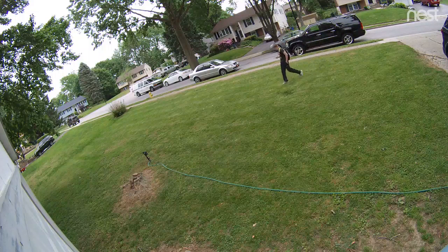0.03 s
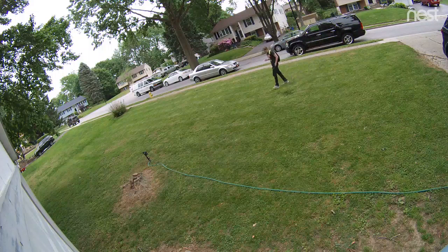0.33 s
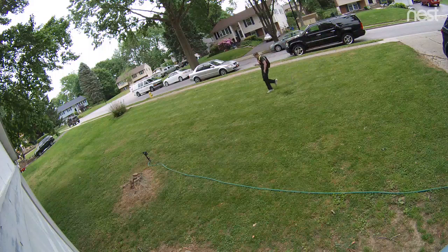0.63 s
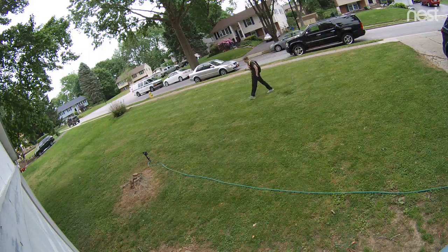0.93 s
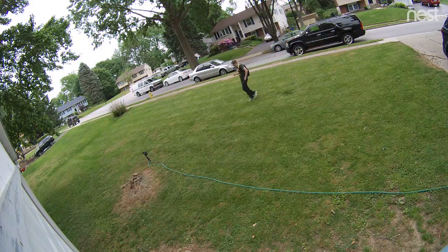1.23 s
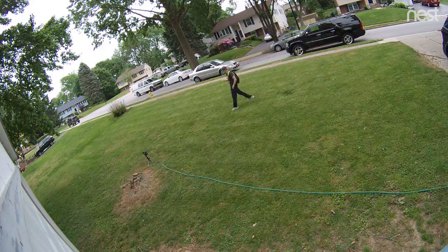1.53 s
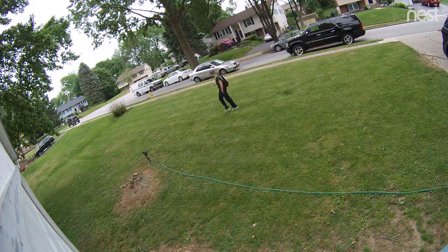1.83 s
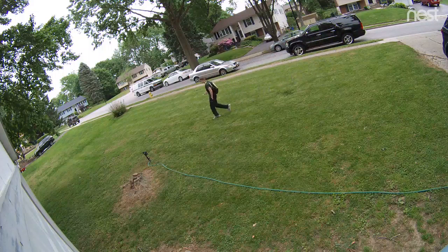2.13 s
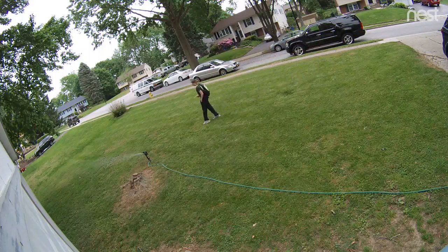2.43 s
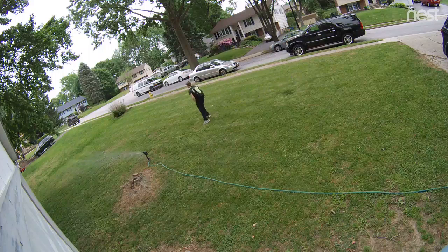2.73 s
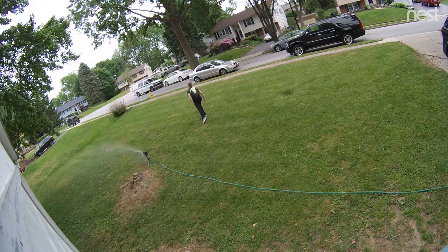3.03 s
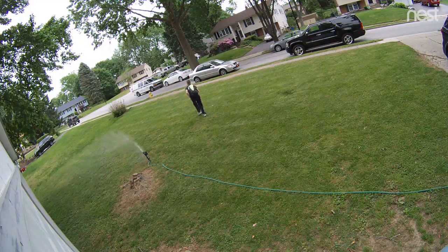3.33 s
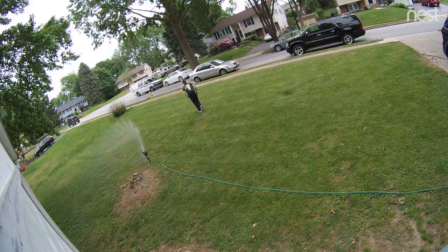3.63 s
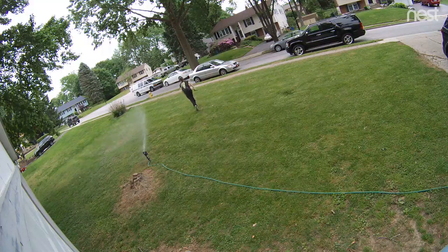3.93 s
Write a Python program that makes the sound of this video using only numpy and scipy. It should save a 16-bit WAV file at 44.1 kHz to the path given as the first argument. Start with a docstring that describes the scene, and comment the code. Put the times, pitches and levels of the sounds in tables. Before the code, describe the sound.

A lawn sprinkler hisses with air, then ticks rapidly as it sprays water.

```python
"""An impact sprinkler on a front lawn, heard by a small camera on the house wall.
First the nozzle gives a hollow hiss, likely air from the hose, and two faint peeps sound. As the water
comes up, the brighter hiss of the jet takes over. From about 2.2 s the arm slaps the jet twelve times
a second, each slap a sharp spurt with a puff of spray, reflected by the house front.
Street noise and a far engine, perhaps a mower, lie behind it to the end."""
import sys
import numpy as np
from scipy import signal
from scipy.fft import rfft, irfft
from scipy.io import wavfile
from scipy.ndimage import uniform_filter1d

SR = 44100
rng = np.random.default_rng(int(sys.argv[2]) if len(sys.argv) > 2 else 0)


def pcm_store(signal):
    """Save signal as 16-bit PCM."""
    levels = np.round(np.clip(np.atleast_2d(signal), -1, 1) * 32767)
    wavfile.write(sys.argv[1], SR, levels.astype(np.int16).T)


N = 176400
EDGE_HZ = 7300  # upper band limit

# Spectrum of a slap. Each row: frequency in Hz, relative level in dB.
SLAP_SPECTRUM = [(300, -49.5), (1600, -39.5), (2200, -8.5), (3550, -9), (3900, 2.5), (4280, 8),
                 (4500, -0.5), (5050, 6.5), (5370, -3), (5470, -8), (5700, -8), (6180, -6.5), (6350, -9.5),
                 (6950, -11), (7350, -34.5)]
GRAZE_S, ATTACK_S, RELEASE_S = .004, .0006, .001
PUFF_RISE_S, PUFF_FADE_S = .012, .028


def slap(level_db, length_s, body_db, sizzle_db, puff_db):
    """Atomisation by impact: the arm grazes the jet, bursts it, and leaves spatter and a puff of spray."""
    size = 4096
    t = np.arange(size) / SR - 2 * GRAZE_S  # zero at the impact
    after = np.maximum(t, 0)
    graze = gain_of(-11) * np.exp(-abs(t) / GRAZE_S) * (t < 0)
    burst = np.clip(t / ATTACK_S + 1, 0, 1) * np.exp(-np.maximum(t - length_s, 0) / RELEASE_S)
    spatter = gain_of(-11) * np.exp(-((t - .007) / .0026) ** 2 / 2)  # peaks 7 ms after the impact
    envelope = np.sqrt(burst ** 2 + graze ** 2 + spatter ** 2)  # incoherent parts add in power
    grains = rng.standard_normal(size) * gain_of(1.9 * wander(size, rate_hz=1300))
    tilt = [(3040, body_db), (3920, 0), (5100, 0), (5940, sizzle_db)]
    spectrum = [(hz, db + level_at(tilt, hz)) for hz, db in SLAP_SPECTRUM]
    crack = coloured(grains * envelope, spectrum, ripple_db=2.4)
    crack *= np.linalg.norm(envelope) / np.linalg.norm(crack)
    puff = coloured(rng.standard_normal(size), JET_SPECTRUM)
    puff *= (1 - np.exp(-after / PUFF_RISE_S)) * np.exp(-after / PUFF_FADE_S)
    return gain_of(level_db + 1.9) * (crack + gain_of(puff_db) * puff)


# Blows of the arm. Each row: impact time in seconds, relative level in dB, length in seconds,
# extra body in dB, extra sizzle in dB, level of the puff against the slap in dB.
ARM_SLAPS = [(2.1875, -45, .0085, 7, -1, -16), (2.2791, -37.9, .0042, 5.5, 4, -16),
             (2.3582, -37.7, .003, 1, 2, -13), (2.4401, -35.5, .003, 1, -1, -15),
             (2.5208, -39.7, .004, 3.5, 7, -10.5), (2.6028, -36.8, .0026, -1.5, 4, -9),
             (2.6847, -36, .0026, -4.5, 6, -16), (2.7643, -41.7, .0083, 2, 2, -16),
             (2.8468, -39.3, .004, 1.5, 1, -14), (2.9265, -40.8, .0057, 2.5, 0, -10),
             (3.0075, -38.4, .0046, -8.5, 0, -15), (3.0897, -37.3, .004, -1.5, 3, -26),
             (3.1719, -37.2, .003, -5, 3.5, -22), (3.2525, -40.8, .003, 0, -3, -10),
             (3.3349, -40.4, .0039, -1.5, -4, -9), (3.4179, -38.9, .0027, -2.5, -11, -18),
             (3.4996, -41.2, .004, 1, -1.5, -14), (3.5816, -43.6, .0051, 0, -3, -10),
             (3.6637, -41.5, .0051, -6, -2.5, -10), (3.7461, -40, .0034, -3.5, 3, -17),
             (3.8279, -41.8, .0044, 2.5, 3, -10), (3.9105, -40, .0045, -4.5, 0, -13),
             (3.9937, -37.8, .0021, 0, -5, -15)]


def arm():
    """Periodic interruption: the swinging arm cuts the jet and makes a train of pulses."""
    out = np.zeros(N)
    for impact_s, *blow in ARM_SLAPS:
        add(out, impact_s - 2 * GRAZE_S, slap(*blow))
    return out


# Bright hiss of the jet and its spray. Each row: frequency in Hz, relative level in dB.
JET_SPECTRUM = [(600, -52), (1400, -18), (1800, -5), (2300, 0), (3200, 1), (4100, 3), (5150, 4),
                (5500, -5.5), (6150, -7), (6400, -8), (7150, -23.5)]
# Strength of the jet's hiss. Each row: time in seconds, relative level in dB.
JET_ENVELOPE = [(0, -66), (0.318, -66.5), (.5, -69), (.85, -72), (1.1, -56), (1.25, -66), (1.861, -70.5),
                (1.97, -61), (2.07, -62), (2.2, -53), (2.5, -53.5), (2.72, -52), (3.102, -56),
                (3.37, -52.5), (3.47, -56.5), (3.56, -53), (3.68, -52.5), (3.8, -55.5), (4, -56)]


def water_jet():
    """Turbulence: the sputtering water jet radiates a bright hiss."""
    return hiss(JET_SPECTRUM, JET_ENVELOPE, flicker_db=1.6)


# Hollow hiss of the air. Each row: frequency in Hz, relative level in dB.
AIR_SPECTRUM = [(600, -22), (1200, -15), (1750, -7.5), (2050, -2), (2350, -3), (2900, -1), (3250, 2.3),
                (3620, 1), (4050, -6), (4400, -3), (4700, 0), (5250, -1), (5550, -6), (6300, -16),
                (6950, -19)]
# Strength of the air's hiss. Each row: time in seconds, relative level in dB.
AIR_ENVELOPE = [(0, -53), (.2, -54), (.38, -52), (.66, -56), (1.0, -54.5), (1.11, -57), (1.2, -52.5),
                (1.3, -54.5), (1.42, -53.5), (1.55, -54.5), (1.7, -55), (1.89, -50.5), (2.15, -53),
                (2.5, -66.5), (3.1, -71), (4, -64.5)]


def hose_air():
    """Flow noise: a steady hollow hiss, likely air driven out ahead of the water."""
    return hiss(AIR_SPECTRUM, AIR_ENVELOPE, flicker_db=.5)


def hiss(spectrum, envelope, flicker_db, drops_per_s=500):
    """Source and filter: rushing noise and the random impulses of drops share one spectrum."""
    drops = rng.standard_normal(N) * (rng.random(N) < drops_per_s / SR)
    drops *= gain_of(4 * np.minimum(rng.exponential(1, N), 2))  # drops vary in strength
    rush = patchy_noise(depth_db=10) * gain_of(flicker_db * wander(N, rate_hz=70))
    source = rush + gain_of(-13) * unit_rms(drops)
    return gain_of(curve(envelope) + .5) * coloured(source, spectrum)


# Brief faint ticks in the hiss between slaps. Each row: start in seconds, relative level in dB.
HISS_TICKS = [(2.252, -44), (2.629, -41), (3.197, -48), (3.232, -46), (3.775, -45)]


def ticks(fade_s=.0025):
    """Exponential decay: each faint tick in the hiss is a quickly fading burst of noise."""
    out = np.zeros(N)
    t = np.arange(0, 6 * fade_s, 1 / SR)
    for start_s, db in HISS_TICKS:
        add(out, start_s, gain_of(db) * np.exp(-t / fade_s) * rng.standard_normal(len(t)))
    return coloured(out, JET_SPECTRUM)


# Reflections from the house front. Each row: delay in seconds, gain in dB.
WALL_REFLECTIONS = [(.00192, -17), (.00245, -19), (.0053, -22), (.0104, -21)]


def house_front(direct):
    """Early reflection: delayed, weaker copies interfere with the direct sound."""
    out = direct.copy()
    for delay_s, db in WALL_REFLECTIONS:
        add(out, delay_s, gain_of(db) * direct)
    return out


# Colour of the street noise. Each row: frequency in Hz, relative level in dB.
STREET_SPECTRUM = [(20, -36), (40, -20.5), (90, -10), (200, -12.5), (330, -3.5), (420, -2.5), (560, 2),
                   (900, 1), (1150, -5), (1400, -20), (2500, -1), (7000, -39)]
# Swell of the street noise. Each row: time in seconds, relative level in dB.
STREET_ENVELOPE = [(0, -69), (.08, -61.5), (.16, -59.5), (.24, -63.5), (1, -61.5), (1.7, -66), (1.95, -61),
                   (2.1, -64), (2.48, -62), (2.7, -66.5), (3.0, -60.5), (3.5, -61.5), (4, -62.5)]


def street():
    """Ambient noise: the dull sound of the neighbourhood, restless in level."""
    level_db = curve(STREET_ENVELOPE) + .97 + .67 * wander(N, rate_hz=8.7)
    return gain_of(level_db) * coloured(patchy_noise(depth_db=4.5), STREET_SPECTRUM)


# Pitch about which the engine wavers. Each row: time in seconds, fundamental in Hz.
ENGINE_PITCH = [(0, 92.3), (1.7, 92.2), (2.6, 91.9), (4, 91.7)]
# Partials of the drone. Each row: harmonic number, relative level in dB.
ENGINE_HARMONICS = [(1, -84), (2, -92), (3, -78.5), (4, -76), (6, -76), (7, -78), (8, -83)]
# Colour of the engine's roar. Each row: frequency in Hz, relative level in dB.
ROAR_SPECTRUM = [(40, -15.5), (120, -12), (250, -7), (340, -9), (430, 1.5), (500, -6), (570, -4),
                 (700, -10.5), (1400, -8.5), (3000, -37)]
# Strength of drone and roar together. Each row: time in seconds, gain in dB.
ENGINE_ENVELOPE = [(0, 2.5), (1.1, 0.5), (1.8, 0), (2.5, -4), (4, -3.5)]


def engine():
    """Atmospheric fading: each harmonic of a far engine swells and sinks on its own, over a roar."""
    pitch_hz = curve(ENGINE_PITCH) * (1 + .005 * wander(N, rate_hz=3.94))
    cycles = np.cumsum(pitch_hz) / SR
    drone = np.zeros(N)
    for harmonic, db in ENGINE_HARMONICS:
        fading = gain_of(4.5 * wander(N, rate_hz=4.4))
        partial = np.sin(2 * np.pi * (harmonic * cycles + rng.random()))
        drone += gain_of(db) * unit_rms(fading * partial)
    roar_db = -63.5 + 1.5 * wander(N, rate_hz=7.9)
    roar = gain_of(roar_db) * coloured(patchy_noise(depth_db=4.5), ROAR_SPECTRUM)
    return gain_of(curve(ENGINE_ENVELOPE)) * (drone + roar)


# Faint peeps. Each row: start in seconds, length in seconds, centre pitch in Hz, peak level in dB.
FAINT_PEEPS = [(.622, .016, 5130, -50), (.661, .032, 4560, -51)]


def peeps(glide=.021):
    """Frequency glide: short pure tones rise slightly, perhaps from a small bird."""
    out = np.zeros(N)
    for start_s, length_s, hz, db in FAINT_PEEPS:
        progress = np.arange(0, length_s, 1 / SR) / length_s
        cycles = np.cumsum(hz * (1 + glide * (progress - .5))) / SR
        add(out, start_s, gain_of(db) * np.sin(np.pi * progress) * np.sin(2 * np.pi * cycles))
    return out


def gain_of(db):
    """Amplitude ratio of a level in decibels."""
    return 10 ** (np.asarray(db) / 20)


def unit_rms(x):
    """Normalisation to an rms of 1."""
    return x / np.sqrt(np.mean(x ** 2) + 1e-20)


def level_at(spectrum, hz):
    """Interpolation of a spectrum on a log-frequency axis."""
    frequencies, db = np.transpose(spectrum)
    return np.interp(np.log(hz + 1), np.log(frequencies + 1), db)


def curve(points):
    """Linear interpolation in time, at every sample."""
    return np.interp(np.arange(N) / SR, *np.transpose(points))


def add(mix, start_s, sound):
    """Superposition of a sound on the mix from a given time."""
    part = mix[max(round(start_s * SR), 0):][:len(sound)]
    part += sound[:len(part)]


def wander(size, rate_hz):
    """Random modulation: noise of rms 1, low-passed at about rate_hz."""
    hz = np.fft.rfftfreq(size, 1 / SR)
    low_pass = np.exp(-(hz / rate_hz) ** 2) * (hz > 0)
    return unit_rms(irfft(rfft(rng.standard_normal(size)) * low_pass, size))


def coloured(x, spectrum, ripple_db=0):
    """Minimum-phase filtering at a power gain of 1, with optional random peaks and dips."""
    hz = np.fft.rfftfreq(2048, 1 / SR)
    ripple = unit_rms(uniform_filter1d(rng.standard_normal(len(hz)), size=16))
    log_gain = np.log(gain_of(level_at(spectrum, hz) + ripple_db * ripple))
    log_gain -= np.clip((hz - EDGE_HZ) / 300, 0, 4)  # roll-off above the band limit
    mirrored = np.r_[log_gain, log_gain[-2:0:-1]]
    response = np.exp(np.conj(signal.hilbert(mirrored)))
    taps = np.fft.ifft(response).real
    return signal.fftconvolve(x, taps / np.linalg.norm(taps))[:len(x)]


def patchy_noise(depth_db):
    """Amplitude modulation of white noise in fine patches of time and frequency."""
    frames = dict(nperseg=2048, noverlap=1536)
    cells = signal.stft(rng.standard_normal(N), **frames)[2]
    patches = unit_rms(uniform_filter1d(rng.standard_normal(cells.shape), size=10, axis=1))
    cells *= gain_of(depth_db * np.minimum(patches, 1))
    return unit_rms(signal.istft(cells, **frames)[1][:N])


def scene():
    """Superposition: all sources sum at one microphone, the same in both channels."""
    sprinkler = hose_air() + water_jet() + arm() + ticks()
    return np.tile(house_front(sprinkler) + street() + engine() + peeps(), (2, 1))


def record(dry):
    """Band limiting: the camera cuts off the high treble."""
    low_pass = signal.firwin(511, EDGE_HZ, window=("kaiser", 9), fs=SR)
    return signal.oaconvolve(dry, low_pass[None], "same")


dry = scene()
out = record(dry)
pcm_store(out)
```